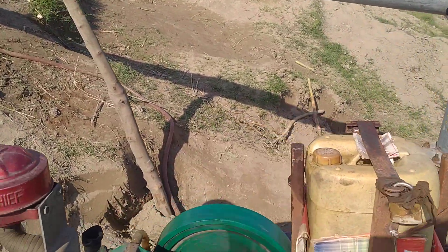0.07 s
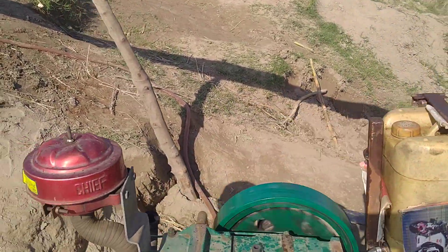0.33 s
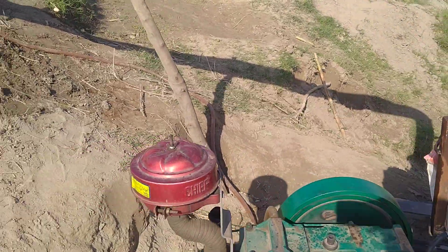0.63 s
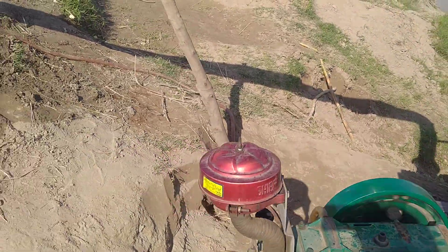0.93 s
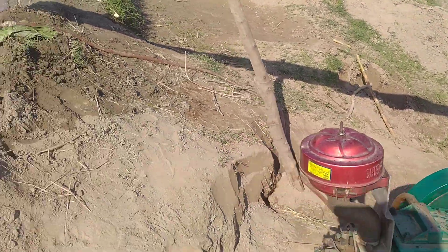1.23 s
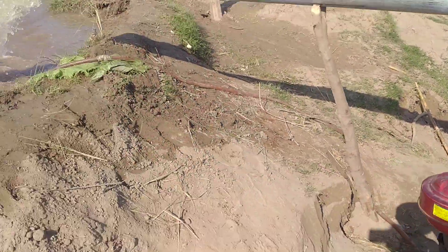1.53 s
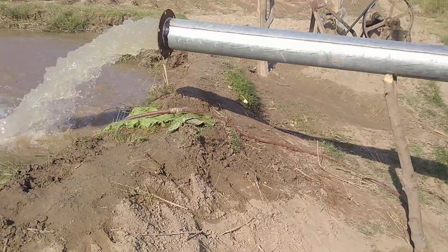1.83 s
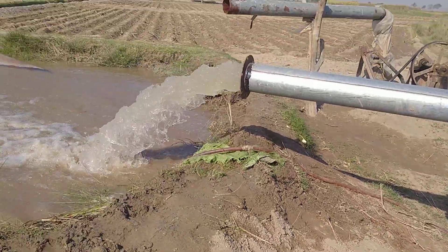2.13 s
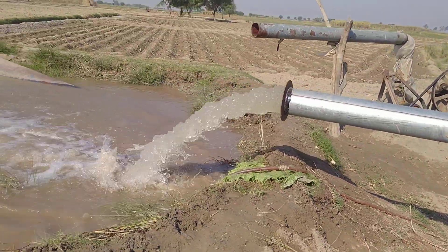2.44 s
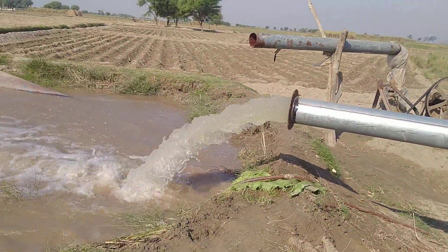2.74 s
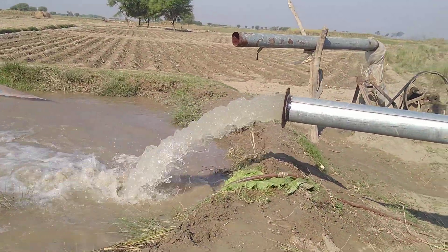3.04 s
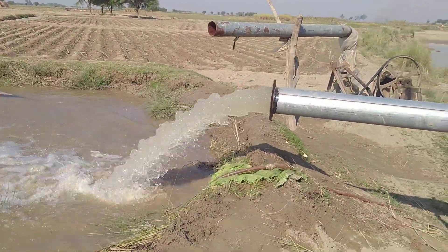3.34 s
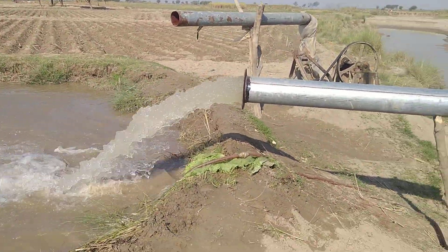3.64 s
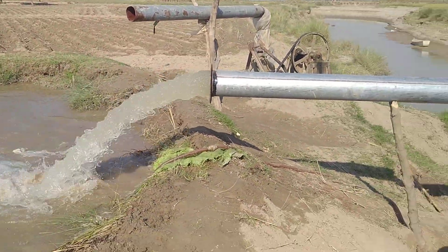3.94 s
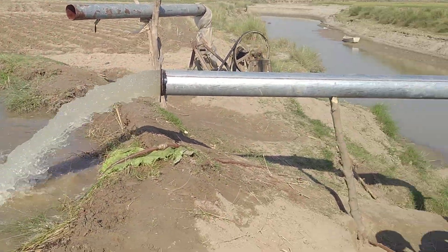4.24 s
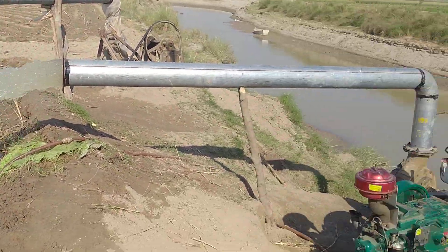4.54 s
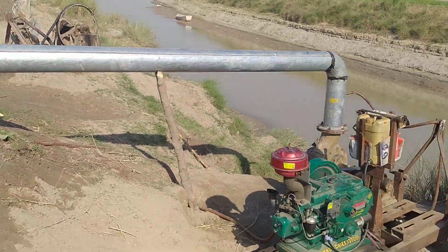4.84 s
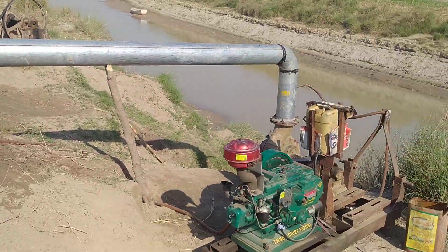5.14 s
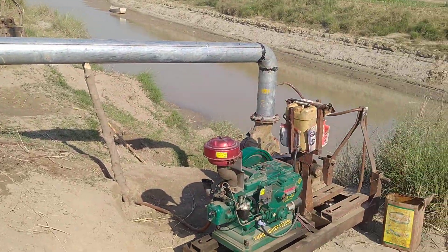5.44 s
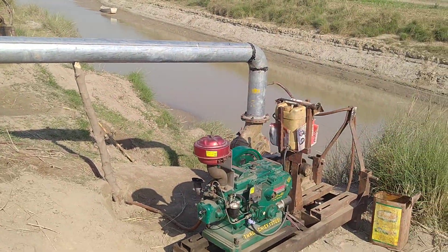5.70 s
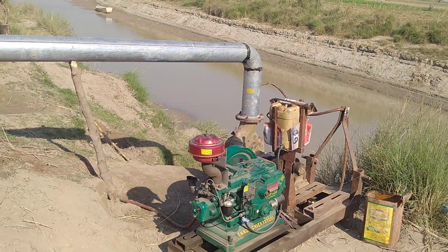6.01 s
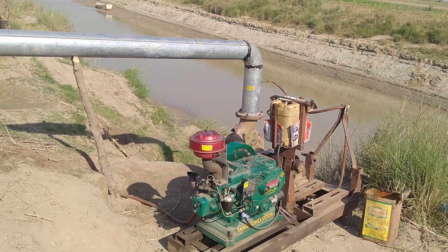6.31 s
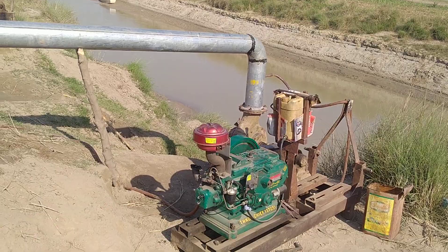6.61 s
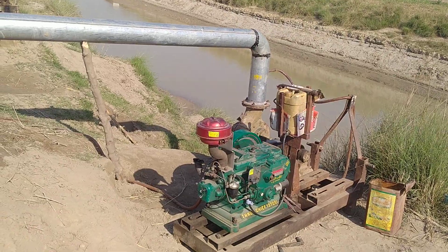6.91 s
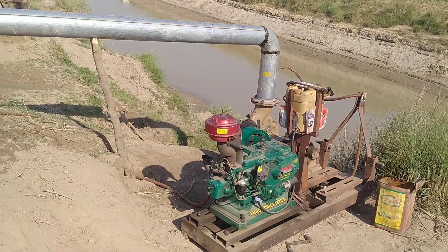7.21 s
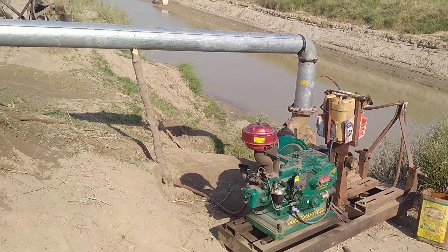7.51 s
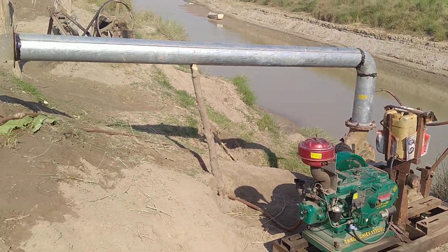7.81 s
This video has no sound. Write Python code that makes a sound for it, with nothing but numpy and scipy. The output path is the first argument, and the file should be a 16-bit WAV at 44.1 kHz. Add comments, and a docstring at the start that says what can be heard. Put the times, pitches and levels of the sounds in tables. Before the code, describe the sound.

A single-cylinder diesel engine drives a water pump outdoors, thumping evenly about nine times a second with hard knocks, exhaust cracks and gear clatter. The microphone starts close to the gulping air intake, with water splashing faintly behind. As it turns and moves away, the gulps and water fade and the engine dulls. Then the clatter brightens again from farther off, and a loose cover tinks ever louder.

```python
"""Beside a canal, a single-cylinder four-stroke diesel drives a belt pump, nine firings a second.
The microphone starts at the gulping air cleaner: combustion knocks the block, the exhaust cracks open,
the pipes thump, gears clatter, and water gushes from the outlet behind. From 1.4 s it turns aside and
steps away; the gulps fade, and then the water. From about 4 s it turns back to the engine from farther
off: the clatter brightens and a loose cover tinks ever louder."""
import sys
import numpy as np
from scipy import signal
from scipy.fft import rfft, irfft, next_fast_len
from scipy.io import wavfile
from scipy.ndimage import uniform_filter1d

SR = 44100
rng = np.random.default_rng(int(sys.argv[2]) if len(sys.argv) > 2 else 0)


def digitize_waveform(pressure):
    """Quantize a signal to 16-bit integers and store it at the path in sys.argv[1].

    Rows of a 2-D input are taken as channels; values are limited to [-1, 1].
    """
    field = np.atleast_2d(pressure).T
    bounded = np.clip(field, -1, 1)
    quanta = np.round(bounded * 32767).astype(np.int16)
    wavfile.write(sys.argv[1], SR, quanta)


N = 346626
TIME = np.arange(N) / SR


# crank speed under the governor: (time [s], speed [rpm])
CRANK_SPEED = [(0.0, 1081.4), (0.5, 1082.5), (1.0, 1077.2), (1.5, 1074.8), (2.0, 1079.2), (2.6, 1077.3),
               (3.2, 1085.5), (3.8, 1075.0), (4.4, 1081.7), (5.5, 1079.8), (6.7, 1081.5), (7.86, 1086.2)]
def firings(first_s=.0095):
    """Firing times in seconds: one in every two turns of the crank, beginning one cycle early."""
    rpm, = curves(CRANK_SPEED)
    cycles = np.cumsum(rpm) / (120 * SR)
    s = first_s + np.interp(np.arange(int(cycles[-1]) + 1), cycles, TIME)
    return np.r_[2 * s[0] - s[1], s]


# gas surges in the pipes: (time after firing [ms], pitch [Hz], swell [ms], level [dB])
PIPE_SURGES = [(21.9, 103, 4.2, -20.5), (35.83, 135.4, 5.3, -5), (54.77, 134, 6.15, -11.5),
               (84.57, 142.8, 9.2, -12)]
def thumps(fire):
    """Surging gas rings the exhaust and intake pipes in every cycle, deep at any distance."""
    return pipe_rings(fire, PIPE_SURGES, spread_db=0.24, jitter_ms=0.062)


# gulps of the air cleaner: (time after firing [ms], pitch [Hz], swell [ms], level [dB])
INTAKE_GULPS = [(17.27, 440, 1.7, -10), (55.2, 227, 2.47, -2), (85.7, 275, 3.3, -9.5)]
def air_cleaner(fire, closeness):
    """Drawn air rings the air cleaner, heard only with the microphone close by."""
    return closeness * pipe_rings(fire, INTAKE_GULPS, spread_db=0.2, jitter_ms=0.031)


# modes of the block and its covers: (pitch [Hz], level [dB], time to fall 60 dB [s])
BLOCK_MODES = [(364, -5.5, 0.1), (607, -8, 0.093), (748.7, 3, 0.087), (833, -1, 0.043), (897, 1, 0.11),
               (1024, -5, 0.092), (1060, -9, 0.019), (1255, -0.5, 0.059), (1384, -9, 0.076),
               (1664, -8, 0.22), (1970, -4, 0.066), (1975, -13, 0.083), (2324, 0.5, 0.05)]
# blows on the block: (time after firing [ms], level [dB])
BLOCK_BLOWS = [(.8, -2), (7.4, 0), (13.6, -6.5)]
# spectra of the casting's knock and of a hissing jet: (frequency [Hz], level [dB])
KNOCK_SPECTRUM = [(200, -22), (500, -3), (760, 2.5), (1200, -1), (1700, -2.5), (2450, -6.5), (3300, -29),
                  (4100, -40), (6500, -30), (8200, -54), (15500, -43)]
JET_SPECTRUM = [(1500, -3), (4000, 10), (7500, -1.5), (8400, -3), (11000, -4), (13500, -0.5), (16000, -4)]
def knock(fire, closeness):
    """Combustion and piston slap ring the block almost alike in every cycle; the injector hisses."""
    t = np.arange(SR // 10) / SR
    ring = sum((-1) ** k * amp(db) * np.exp(-np.log(1000) * t / t60) * np.sin(2 * np.pi * hz * t)
               for k, (hz, db, t60) in enumerate(BLOCK_MODES))
    blows = sum(amp(db) * repeat(ring, after(fire, ms), spread_db=2.5, jitter_ms=0.04)
                for ms, db in BLOCK_BLOWS)
    blows = (1 - 0.5 * closeness) * unit_rms(blows)
    casting = metal_burst(KNOCK_SPECTRUM, rise_s=0.00042, decay_s=0.025)
    bursts = repeat(casting, after(fire, -0.29), spread_db=0.9, jitter_ms=0.026)
    burn = noise(KNOCK_SPECTRUM) * puff(fire, -1.74, rise_ms=0.55, decay_ms=22.4)
    injector = noise(JET_SPECTRUM) * puff(fire, -1.2, rise_ms=1.3, decay_ms=4.8, spread_db=2.5)
    return amp(-24.5) * blows + amp(-21.5) * bursts + amp(-23) * burn + amp(-49) * injector


def clank(fire, pitch_hz=1175, stray=0.087):
    """Each combustion clanks in the cylinder head: three short rings, never quite at one pitch."""
    out = np.zeros(N)
    for ms, ratio, db in [(-1.4, 1.012, -10.5), (6.5, 1.073, -18.0), (11, 0.934, -15.5)]:
        hz = ratio * pitch_hz * np.exp(stray * rng.standard_normal(len(fire)))
        out += rings([(s, f, db) for s, f in zip(after(fire, ms), hz)], swell_ms=2.46)
    return out


def covers(fire, bright_db):
    """Thin side covers give each combustion a hard, bright front."""
    spectrum = [(900, -1), (1400, -22), (1900, -4), (2400, 5), (2650, 1), (4000, -18)]
    sheet = metal_burst(spectrum, rise_s=0.00043, decay_s=0.02)
    return amp(-25 + bright_db) * repeat(sheet, after(fire, 0.25), spread_db=0.5, jitter_ms=0.016)


# spectra of the gas leaving the exhaust: (frequency [Hz], level [dB])
CRACK_SPECTRUM = [(2000, -3), (3300, 3.5), (4200, 1), (5100, 2), (6400, -1.5), (7700, -6), (8200, -18.5),
                  (12000, -54)]
BARK_SPECTRUM = [(150, -12), (330, -4.5), (550, -6), (900, 4), (1300, 3), (1800, 6), (2200, -12),
                 (2800, -31), (4000, -50)]
RASP_SPECTRUM = [(1200, -33), (2000, 0), (2400, 3.5), (3000, 1), (3350, -1.5), (3800, -14), (4600, -32),
                 (8000, -27)]
def blowdown(fire, walk):
    """The exhaust valve opens and the gas bursts out with a sharp crack, a bark and a rasp."""
    crack = noise(CRACK_SPECTRUM) * puff(fire, 22.1, rise_ms=4.7, decay_ms=3.94, spread_db=1.5)
    bark = noise(BARK_SPECTRUM) * puff(fire, 19.7, rise_ms=2.13, decay_ms=5.6, spread_db=1.5)
    rasp = noise(RASP_SPECTRUM) * puff(fire, 21.25, rise_ms=3.3, decay_ms=11.8, spread_db=1.5)
    return (amp(mic_db(walk, far=-24.5, close=-1, facing=1)) * crack
            + amp(mic_db(walk, far=-14, close=4, facing=-3)) * bark
            + amp(mic_db(walk, far=-20, close=1.5, facing=6)) * rasp)


def exhaust_jet(fire, treble_db):
    """The jet of gas hisses on through the exhaust stroke."""
    spit = amp(-33) * puff(fire, 18, rise_ms=3.2, decay_ms=4.1)
    stroke = amp(-41.5) * puff(fire, 22.7, rise_ms=9.2, decay_ms=24)
    last_push = amp(-42.5) * puff(fire, 46.7, rise_ms=7, decay_ms=3.9)
    return amp(0.32 * treble_db) * noise(JET_SPECTRUM) * (spit + stroke + last_push)


# firings that bang harder: (time [s], pitch [Hz], level [dB])
HARD_BANGS = [(.807, 2560, -12), (1.141, 3250, -13.5), (1.922, 1400, -9), (2.033, 4800, -23.5),
              (2.59, 1710, -12), (4.259, 2360, -9), (6.811, 2860, -12)]
def pipe_mouth(fire, walk, pitch_hz=1875, edge_hz=5400):
    """Escaping gas rings the exhaust with a shrill edge; now and then a harder bang rings it clearly."""
    stray, size, edge_stray, edge_size = rng.standard_normal((len(fire), 4)).T
    closeness, facing = (np.interp(fire, TIME, control) for control in walk)
    octaves = -0.42 * closeness + .58 * facing + 0.127 * stray  # lower close by, higher head-on
    ring = rings(zip(after(fire, 22), pitch_hz * 2 ** octaves, -19 + 1.5 * size), swell_ms=5.05)
    shrill_hz = edge_hz * np.exp(0.131 * edge_stray)
    edge = rings(zip(after(fire, 20.5), shrill_hz, -27 + 1.75 * edge_size), swell_ms=2.56)
    return ring + edge + rings(HARD_BANGS, swell_ms=5)


# spectra of the running gear's rattle: (frequency [Hz], level [dB])
DULL_RATTLE = [(20, -22), (50, -11), (110, -0.5), (200, 9), (320, 6.5), (450, 1), (560, -2), (760, 5),
               (1000, 0), (1400, 0.5), (1900, -7), (2600, -12), (4000, -26.5)]
BRIGHT_RATTLE = [(1000, -37), (1900, 5.5), (2400, 6), (2850, 6), (3100, 3), (3330, 2), (3700, -7),
                 (4200, -14), (5500, -22), (7500, -32), (9000, -45)]
def clatter(fire, dull_db, bright_db):
    """Gears, bearings and belt rattle all round the cycle, most as the valves change over."""
    valve_overlap = puff(fire, 53, rise_ms=10, decay_ms=11, spread_db=1)
    exhaust_stroke = puff(fire, 28, rise_ms=6, decay_ms=28, spread_db=1)
    busy = 0.98 + 0.71 * valve_overlap + 0.079 * exhaust_stroke
    # the noise is backlash, the share that never repeats
    dull = amp(-27) * noise(DULL_RATTLE)
    dull += amp(-31) * gear_teeth(DULL_RATTLE, fire, spread_db=1, jitter_ms=0.04)
    bright = amp(-39.5) * noise(BRIGHT_RATTLE, grains_per_s=1500)
    bright += amp(-37) * gear_teeth(BRIGHT_RATTLE, fire, spread_db=2, jitter_ms=0.09)
    return busy * (amp(dull_db) * dull + amp(bright_db) * bright)


def gear_teeth(spectrum, fire, spread_db, jitter_ms):
    """The same teeth meet at the same crank angles, so one rough rattle comes round every cycle."""
    length = round(1.1 * np.mean(np.diff(fire)) * SR)
    cycle = colour(rng.standard_normal(length), spectrum) * signal.windows.tukey(length, .2)
    return unit_rms(repeat(cycle, fire, spread_db, jitter_ms))


# tink of a loose cover: (time [s], level [dB])
TINK_LEVEL = [(0, -34), (1.5, -30), (2.2, -43), (5, -40), (6, -27), (7.86, -19)]
def tappets(fire, bright_db):
    """The valve gear ticks five times a cycle, and a loose cover answers the intake valve."""
    ticks = np.concatenate([after(fire, ms) for ms in (38, 48.9, 56.1, 64.2, 91.3)])
    late, stray, size = rng.standard_normal((len(ticks), 3)).T
    tick_hz = np.clip(1700 * np.exp(0.286 * stray), 800, 3000)
    rattle = rings(zip(after(ticks, 0.92 * late), tick_hz, -27 + 2.5 * size), swell_ms=2.45)
    detune, tink_size = rng.standard_normal((len(fire), 2)).T
    tink_db = np.interp(fire, *np.transpose(TINK_LEVEL)) + 1.7 * tink_size
    tink = rings(zip(after(fire, 63.4), 3290 * np.exp(0.0097 * detune), tink_db), swell_ms=3.3)
    return amp(.5 * bright_db) * rattle + tink


def ground_echo(x, facing, centre_hz=596, width_hz=220, depth=0.34):
    """The echo off the ground hollows the low mids when the microphone faces the engine."""
    band = signal.lfilter(*signal.iirpeak(centre_hz, centre_hz / width_hz, fs=SR), x)
    return x - depth * facing * band


# spectrum of the splashes behind the engine: (frequency [Hz], level [dB])
SPLASH_SPECTRUM = [(100, -28), (400, 18.5), (900, 2), (1600, -12), (3000, -9), (4500, -6), (7500, -13.5),
                   (9000, -37), (16000, -35)]
def water(walk):
    """The jet from the outlet pipe plunges into the pool in countless splashes."""
    churn_db = 2.8 * unit_rms(uniform_filter1d(rng.standard_normal(N), SR // 25))
    level_db = mic_db(walk, far=-48, close=15, facing=-5)
    return amp(level_db + churn_db) * noise(SPLASH_SPECTRUM, grains_per_s=1700)


# spectrum of the background hiss: (frequency [Hz], level [dB])
HISS_SPECTRUM = [(3000, 3), (5000, 3.5), (7500, -4), (8500, -2.5), (10500, -3), (13000, -0.5), (16000, -5)]
def fine_hiss(treble_db):
    """A faint, grainy hiss lies behind everything."""
    return amp(treble_db - 51) * noise(HISS_SPECTRUM, grains_per_s=9000)


def amp(db):
    """Decibels to gain."""
    return 10 ** (np.asarray(db) / 20)


def unit_rms(x):
    """Scales to rms 1."""
    return x / np.sqrt(np.mean(x ** 2) + 1e-20)


def curves(rows):
    """Each column of a timed table, sample by sample."""
    s, *columns = np.transpose(rows)
    return [np.interp(TIME, s, c) for c in columns]


def colour(x, spectrum):
    """Gives x a spectrum, at rms 1."""
    hz, db = np.transpose(spectrum)
    f = np.fft.rfftfreq(len(x), 1 / SR)
    gain = amp(np.interp(np.log(f + 1), np.log(hz), db, right=db[-1] - 34))
    return unit_rms(irfft(rfft(x) * gain, len(x)))


def noise(spectrum, grains_per_s=None):
    """Coloured noise, smooth or made of separate grains."""
    x = rng.standard_normal(next_fast_len(N, True))
    if grains_per_s:
        x = x * (rng.random(len(x)) < grains_per_s / SR)
    return colour(x, spectrum)[:N]


def after(times, ms):
    """The moments some milliseconds later."""
    return times + ms / 1000


def repeat(shape, starts, spread_db, jitter_ms):
    """Plays a shape at each start, never quite alike in strength or timing."""
    size, late = rng.standard_normal((len(starts), 2)).T
    at = np.round(after(starts, late * jitter_ms) * SR).astype(int) + SR
    train = np.zeros(N + 2 * SR)
    train[at] = amp(spread_db * size)
    return signal.oaconvolve(train, shape)[SR:SR + N]


def puff(fire, delay_ms, rise_ms, decay_ms, spread_db=.9):
    """An envelope for each firing that opens smoothly and dies away, peak near 1."""
    ms = np.arange(SR // 6) * 1000 / SR
    shape = (1 - np.exp(-(ms / rise_ms) ** 2)) * np.exp(-ms / decay_ms)
    return repeat(shape / shape.max(), after(fire, delay_ms), spread_db, jitter_ms=0.49)


def metal_burst(spectrum, rise_s, decay_s):
    """The many small modes of struck metal blur into one rough burst."""
    t = np.arange(SR // 12) / SR
    envelope = (1 - np.exp(-t / rise_s)) * np.exp(-t / decay_s)
    return envelope * colour(rng.standard_normal(len(t)), spectrum)


def pipe_rings(fire, surges, spread_db, jitter_ms):
    """Each surge of gas swells and dies in a pipe resonance."""
    t = np.arange(SR // 8) / SR
    out = np.zeros(N)
    for delay_ms, hz, swell_ms, db in surges:
        age = t * 1000 / swell_ms
        ring = (age * np.exp(1 - age)) ** 2 * np.sin(2 * np.pi * hz * t)
        out += amp(db) * repeat(ring, after(fire, delay_ms), spread_db, jitter_ms)
    return out


def rings(rows, swell_ms):
    """One short ring that swells and dies for each row of (time [s], pitch [Hz], level [dB])."""
    t = np.arange(SR // 10) / SR
    age = t * 1000 / swell_ms
    swell = age * np.exp(1 - age)
    out = np.zeros(N + 2 * SR)
    for s, hz, db in rows:
        out[round((s + 1) * SR):][:len(t)] += amp(db) * swell * np.sin(2 * np.pi * hz * t)
    return out[SR:SR + N]


def mic_db(walk, far, close, facing):
    """Level in dB: `far` when far off and turned away, plus what coming close and facing add."""
    closeness, turned = walk
    return far + close * closeness + facing * turned


# the microphone's path: (time [s], closeness to the air cleaner [0-1], facing the engine [0-1])
MIC_WALK = [(0, 0.98, 0.98), (.6, 0.95, 0.94), (1.4, 0.94, 0.77), (2.1, 0.52, 0.09), (3.2, 0.26, 0.07),
            (4.4, 0.02, 0.33), (5.4, 0.02, 0.81), (7, 0.01, 0.88), (7.86, 0.13, 1)]
# rise and fall of the finest treble: (time [s], level [dB])
TREBLE_LEVEL = [(0, 3.5), (.6, -6), (1.55, -8), (2.1, 0), (4, 1), (6.3, 6), (7.86, 4.5)]
def scene():
    """All parts of the engine on one crank, with the water behind, at one moving microphone."""
    fire = firings()
    walk = np.clip(curves(MIC_WALK), 0, 1)
    closeness, facing = walk
    treble_db, = curves(TREBLE_LEVEL)
    knock_db = mic_db(walk, far=-1, close=3, facing=-1.5)
    dull_db = mic_db(walk, far=-.5, close=4, facing=0.2)
    bright_db = mic_db(walk, far=-6.5, close=1, facing=13)
    pipes = amp(mic_db(walk, far=0.04, close=-1.5, facing=-0.7)) * thumps(fire)
    gulps = amp(mic_db(walk, far=-4, close=1.5, facing=2)) * air_cleaner(fire, closeness)
    exhaust = blowdown(fire, walk) + exhaust_jet(fire, treble_db) + pipe_mouth(fire, walk)
    combustion = amp(knock_db) * (knock(fire, closeness) + closeness * clank(fire))
    combustion += covers(fire, bright_db)
    gear = clatter(fire, dull_db, bright_db) + tappets(fire, bright_db)
    engine = pipes + gulps + ground_echo(exhaust + combustion + gear, facing)
    return (engine + water(walk) + fine_hiss(treble_db))[None]


def record(dry):
    """The microphone sheds deep bass and rounds off the loudest peaks; the highest treble is cut."""
    knee, headroom, top_hz = .6, .28, 15850
    hz = np.fft.rfftfreq(N, 1 / SR)
    low_cut_db = np.interp(hz, [25, 45, 62, 81, 89], [-21, -17, -14, -2, 0])
    thin = irfft(rfft(dry) * amp(low_cut_db), N)
    below_knee = np.clip(thin, -knee, knee)
    rounded = below_knee + headroom * np.tanh((thin - below_knee) / headroom)
    low_pass = signal.firwin(1501, top_hz, window=("kaiser", 9), fs=SR)
    return signal.oaconvolve(rounded, low_pass[None], "same")


dry = scene()
out = record(dry)
digitize_waveform(out)
```